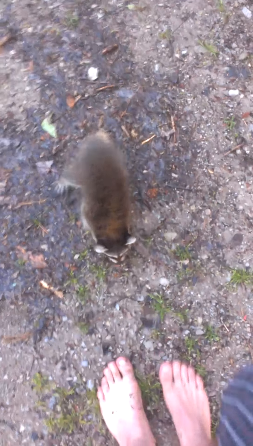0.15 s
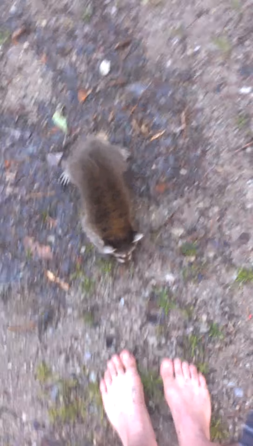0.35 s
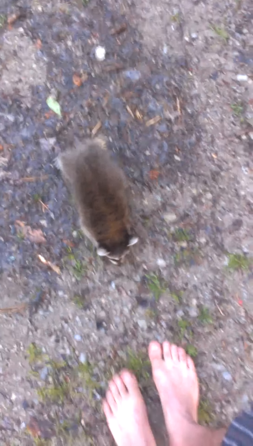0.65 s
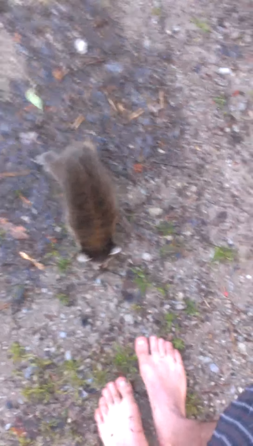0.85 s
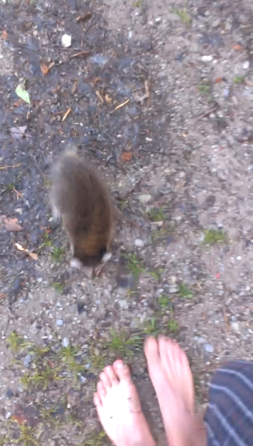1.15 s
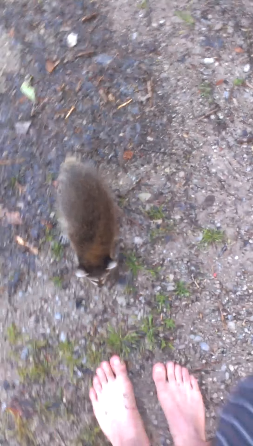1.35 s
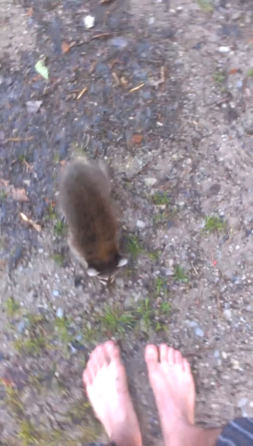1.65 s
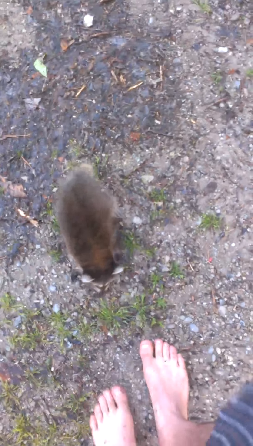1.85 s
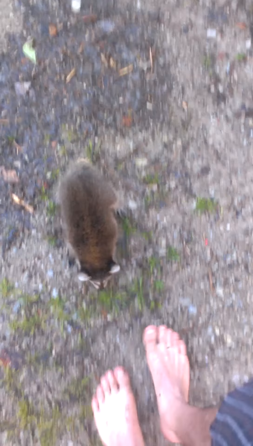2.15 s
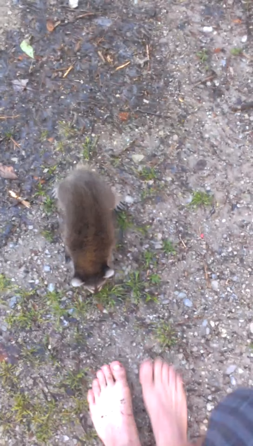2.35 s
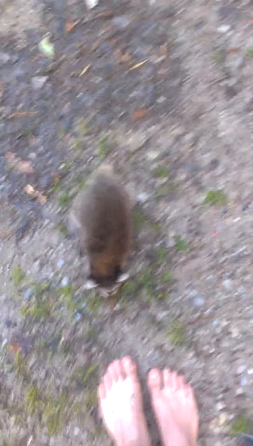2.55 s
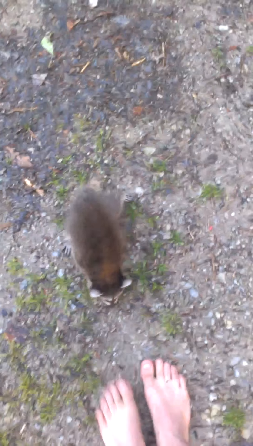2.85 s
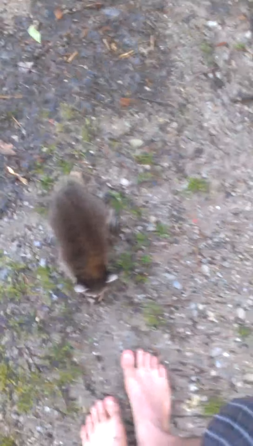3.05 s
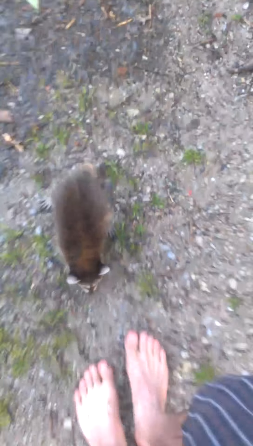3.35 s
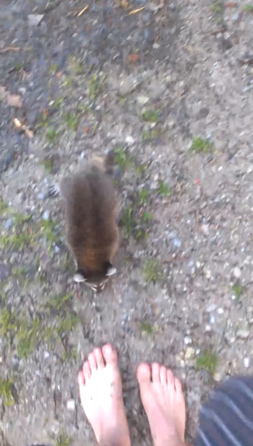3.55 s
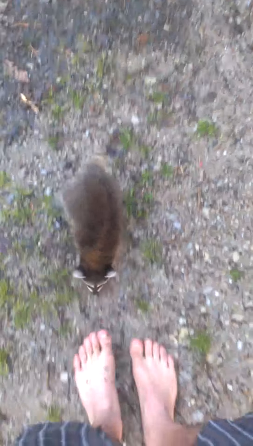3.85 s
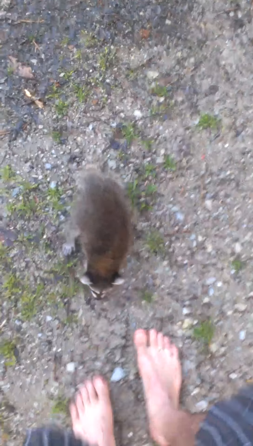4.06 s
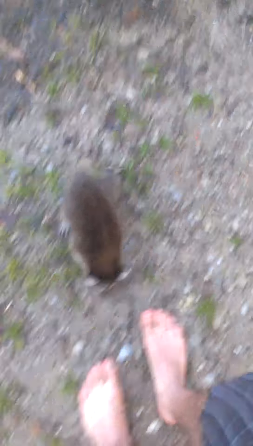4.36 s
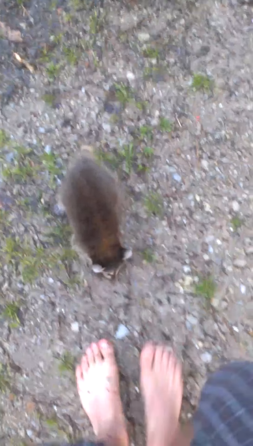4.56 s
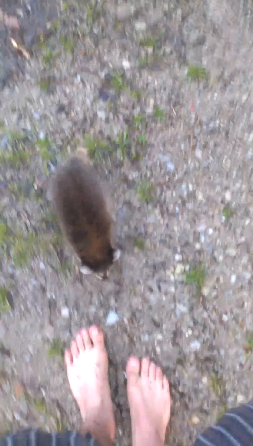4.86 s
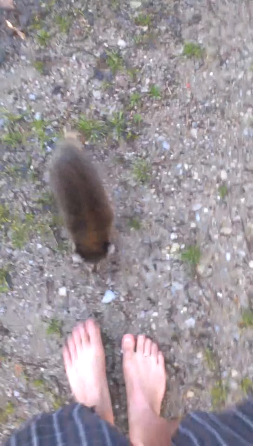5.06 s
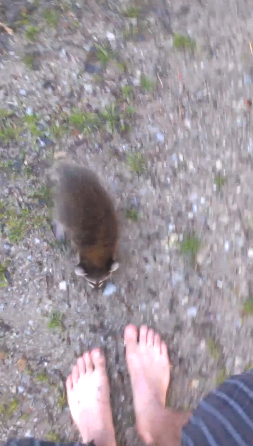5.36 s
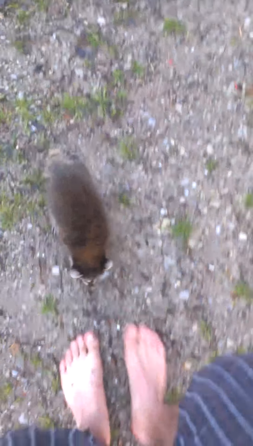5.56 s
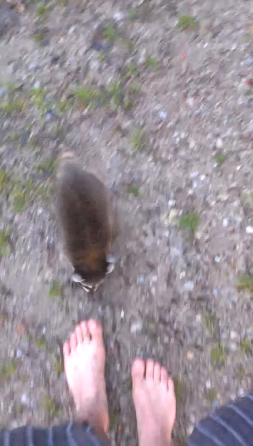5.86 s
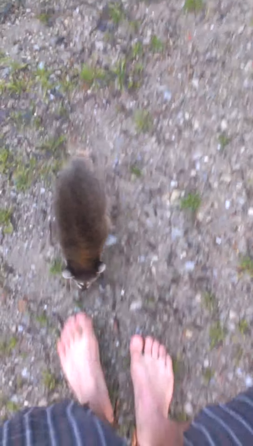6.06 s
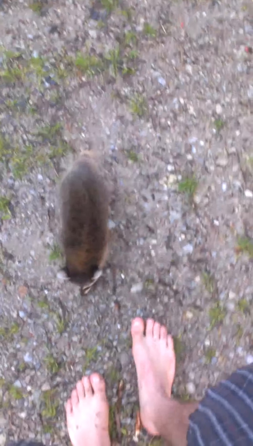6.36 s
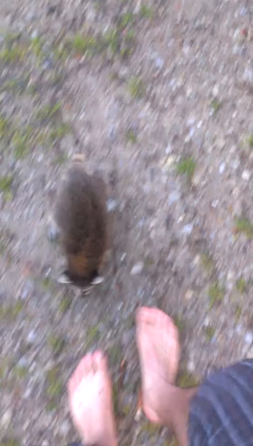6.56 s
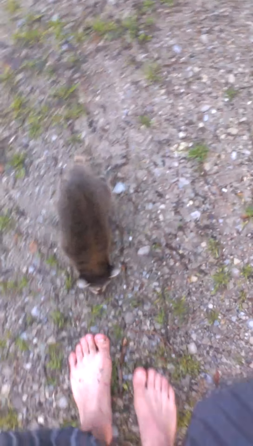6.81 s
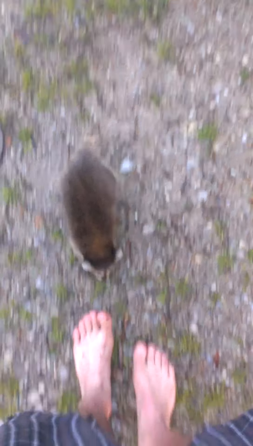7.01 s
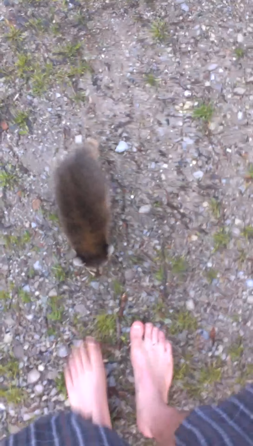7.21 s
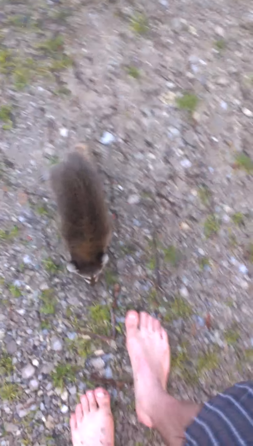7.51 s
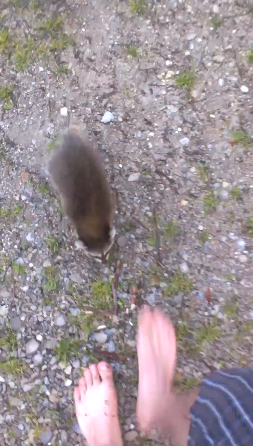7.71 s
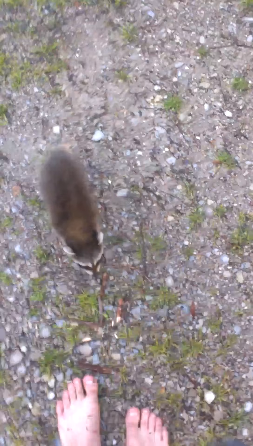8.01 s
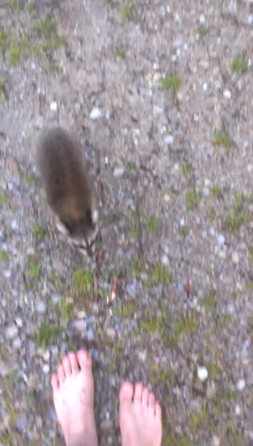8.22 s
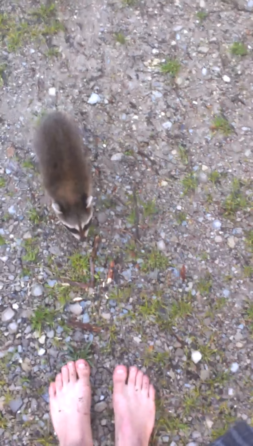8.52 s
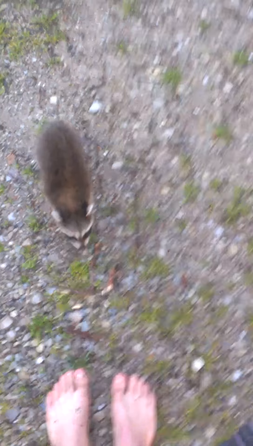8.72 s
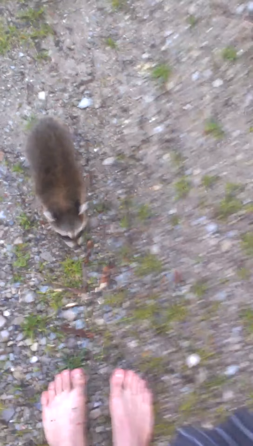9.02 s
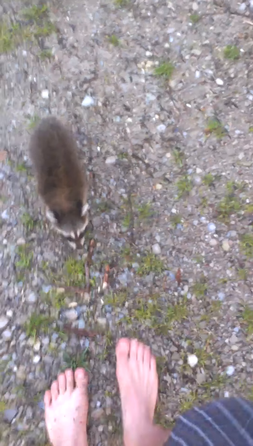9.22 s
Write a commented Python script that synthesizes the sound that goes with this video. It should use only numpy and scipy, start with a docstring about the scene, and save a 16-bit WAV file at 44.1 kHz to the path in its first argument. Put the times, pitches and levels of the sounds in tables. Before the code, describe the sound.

A baby raccoon gives three short rising whistled chirps and fluttering purrs as bare feet crunch softly on gravel, with distant birds singing.

```python
"""Baby raccoon calling on a gravel path

A baby raccoon follows a barefoot walker over gravel, a metre below a hand-held phone with two microphone ports.
It gives three rising whistled chirps and a grunt, built from gliding overtones, and fluttering purrs of short beats.
Grit ticks underfoot as bursts of noise, and cloth rustles; birds whistle gliding tones from the trees.
Soft air and a low far drone lie beneath; the phone's noise suppressor opens for sound in the voice band.
"""
import sys
import numpy as np
from scipy import signal
from scipy.fft import rfft, irfft
from scipy.io import wavfile
from scipy.ndimage import uniform_filter1d

SR = 44100
rng = np.random.default_rng(int(sys.argv[2]) if len(sys.argv) > 2 else 0)


def inscribe(sig):
    """Save sig as 16-bit PCM at rate SR to the path in sys.argv[1].

    A 1-D sig is mono; a 2-D sig holds one channel per row.
    Samples are clipped to [-1, 1] before scaling.
    """
    pcm = np.round(np.clip(np.atleast_2d(sig).T, -1, 1) * 32767)
    wavfile.write(sys.argv[1], SR, pcm.astype(np.int16))


N = 413658
T = np.arange(N) / SR  # time [s]
FREQS = np.fft.rfftfreq(N, 1 / SR) + 1e-3  # [Hz], kept above zero for the logarithm

# three chirps and a grunt, one row a call: (time [s], rasp at the start [dB], length [s], attack [s], scoop [s],
# first pitch [Hz], knee pitch [Hz], top pitch [Hz], level [dB], fade by the end [dB])
CALLS = [(3.347, -60, .216, .028, .047, 585, 868, 1135, -25.4, 4),
         (4.413, -48, .243, .018, .083, 625, 892, 1228, -25.1, 10),
         (6.812, -60, .237, .011, .068, 670, 850, 1252, -25.1, 9.5),
         (6.612, -35.5, .046, .004, .02, 660, 612, 645, -31.3, 13)]


def amp(db):
    """Decibels to gain."""
    return 10 ** (np.asarray(db) / 20)


def unit(x):
    """Scale to rms 1."""
    return x / np.sqrt(np.mean(x ** 2))


def curves(table):
    """The columns of a table as curves in time."""
    s, *columns = np.transpose(table)
    return [np.interp(T, s, c) for c in columns]


def spectra(table):
    """The columns of a table as curves over log frequency."""
    hz, *columns = np.transpose(table)
    return [np.interp(np.log(FREQS), np.log(hz), c) for c in columns]


def resonance(hz, centre, width):
    """Gain of a rounded resonance with steep skirts, down to a quarter one width off centre."""
    return 1 / (1 + ((hz - centre) / width) ** 2) ** 2


def band_noise(size, centre, width):
    """Noise in one resonance, rms 1."""
    spectrum = rfft(rng.standard_normal(size))
    return unit(irfft(spectrum * resonance(np.fft.rfftfreq(size, 1 / SR), centre, width), size))


def walk(rate, size=N):
    """Smooth random curve with a spread near 1, heading for a new value `rate` times a second."""
    k = max(int(SR / rate), 2)
    steps = np.repeat(rng.standard_normal(size // k + 1), k)
    return 1.227 * uniform_filter1d(steps, k)[:size]


def add(out, s, x):
    """Mix a short sound in at time s."""
    i = max(int(s * SR), 0)
    out[i:i + len(x)] += x[:max(N - i, 0)]


def arc(u, first, middle, last):
    """A smooth bend through three values as u goes from 0 to 1."""
    return np.polyval(np.polyfit([0, .5, 1], [first, middle, last], 2), u)


def trees(x, t60, wet_db):
    """Scattered echoes from trunks and leaves, partly alike at the two ports; they fall 60 dB in t60 seconds."""
    t = T[:SR]
    decay = amp(-60 * t / t60) * (1 - np.exp(-t / 0.004))
    mid, side = rng.standard_normal((2, SR)) * decay
    tails = [unit(mid + sign * 0.42 * side) / np.sqrt(SR) for sign in (1, -1)]
    return amp(wet_db) * np.array([signal.fftconvolve(x, h)[:N] for h in tails])


def raccoon(echo_s=.098, echo_db=-27, airy_db=-40.5):
    """The slightly airy voice reaches each port directly and off the ground; a far wall returns it once."""
    # how the near ground colours the two ports: (frequency [Hz], left minus right [dB], left leads [rad])
    port_colour = [(400, -0.5, 0), (661, -0.5, 0.68), (730, 9, 1), (800, 4.5, -.8), (880, -2.5, -.95),
                   (950, -13.5, -.5), (1020, -9, 1.0), (1080, -1, 1.7), (1166, 5.5, 1.3), (1230, 20, .3),
                   (1600, 3, 0), (9000, 3.5, 0)]
    voice = chirps() + purrs()
    effort = uniform_filter1d(np.abs(voice), SR // 200)
    breath = amp(airy_db + 2.5 * walk(30) + 2.5 * walk(400)) * effort * band_noise(N, 4500, 4100)
    voice = voice + breath
    balance_db, lead = spectra(port_colour)
    ratio = amp(balance_db) * np.exp(1j * lead)
    # the two ports average to the plain voice
    ports = 2 * np.array([ratio, np.ones_like(ratio)]) / (1 + ratio)
    near = irfft(rfft(voice) * ports, N)
    dulled = irfft(rfft(voice) * resonance(FREQS, 1300, 450), N)
    echo = amp(echo_db) * np.interp(T - echo_s, T, dulled)
    return near + echo + trees(voice, t60=0.46, wet_db=-22.5)


def chirps(jitter=.004, shimmer_db=0.26, full_voice_db=-35.5, pressed_hz=940, slack_db_per_hz=0.3):
    """A nearly pure rising whistle; its weak overtones light up as they cross the throat's resonances."""
    # throat and mouth resonances, one list a call: (centre [Hz], width [Hz], gain at the peak [dB])
    throats = [
        [(1800, 310, -57.5), (2200, 140, -63.5), (2680, 280, -58.5), (4230, 320, -42.5), (4840, 167, -31),
         (6680, 820, -34)],
        [(1506, 143, -53.5), (2000, 540, -73), (3590, 300, -61), (4470, 540, -39), (4990, 170, -44),
         (5970, 320, -35.5)],
        [(1500, 240, -62.5), (2265, 390, -70), (3690, 190, -54.5), (4530, 450, -39), (5830, 420, -37.5)],
        [(1350, 440, -78)],
    ]
    # the voice's overtones: (multiple of the pitch, level going into the throat [dB])
    overtones = [(2, 7.5), (3, 4), (4, -6), (5, -15), (6, -35), (7, -33.5)]
    out = np.zeros(N)
    for (s, _, *call), throat in zip(CALLS, throats):
        pitch, level = gesture(*call)
        hz = pitch * (1 + jitter * walk(250, len(pitch)))
        db = level + shimmer_db * walk(180, len(hz))
        phase = 2 * np.pi * np.cumsum(hz) / SR
        voice = amp(db) * np.sin(phase)
        # overtones hold while the folds close fully; the high ones bloom once the folds are taut
        closure = amp(2 * np.minimum(db - full_voice_db, 0))
        tension = amp(slack_db_per_hz * np.minimum(hz - pressed_hz, 0))
        for k, overtone_db in overtones:
            k = round(k)
            gain = sum(amp(peak_db) * resonance(k * hz, centre, width) for centre, width, peak_db in throat)
            strength = closure * (tension if k > 2 else 1)
            flicker = amp(overtone_db + 1.8 * walk(150, len(hz)))
            voice += strength * gain * flicker * np.sin(k * phase)
        add(out, s, np.sqrt(2) * voice)
    return out


def gesture(length, attack_s, scoop_s, first_hz, knee_hz, top_hz, level_db, fade_db):
    """Pitch and level of one call: it scoops to its knee, climbs ever faster, rests on top, then drops away."""
    scoop_power, climb_power, fade_power = 1.6, 2.3, 5
    top_hold_s, release_s, drop_hz_per_s = .017, .008, 7500
    t = T[:int((length + 2 * release_s) * SR)]
    strain = np.minimum(t / (length - top_hold_s), 1)
    over = np.maximum(t - length, 0)  # time since the voice let go
    scoop = (first_hz - knee_hz) * np.maximum(1 - t / scoop_s, 0) ** scoop_power
    climb = (top_hz - knee_hz) * strain ** climb_power
    envelope = np.sin(np.pi / 2 * np.minimum(t / attack_s, 1)) * np.exp(-(over / release_s) ** 2)
    db = level_db - fade_db * strain ** fade_power + 20 * np.log10(envelope + 1e-6)
    return knee_hz + scoop + climb - drop_hz_per_s * over, db


def purrs(arch=0.15, second_db=-30, third_db=-40, flutter_db=-10, crackle_db=-10.5, lean=.25,
          length_scatter=.18):
    """Each beat swings the folds for some uneven cycles; pitch arches with a puff that ends faster than it builds."""
    # the folds catch with a short rasp just before each call
    catch_lead_s, catch_s, catch_hz, catch_rough = .002, .005, 600, .8
    catches = [(s - catch_lead_s, catch_hz, db, catch_s, catch_rough) for s, db, *_ in CALLS]
    out, t = np.zeros(N), np.arange(-SR // 40, SR // 40) / SR
    for s, hz, db, length, rough in [*beats(), *catches]:
        u = np.abs(2 * t / (length * np.exp(length_scatter * rng.uniform(-1, 1))))
        pressure = np.exp(-.6 * u ** (2.6 * (1 + lean * np.sign(t))))
        uneven = 1 + .065 * walk(600, len(t))
        arched = 1 + arch * (.3 - np.minimum(u ** 2, 2))
        phase = 2 * np.pi * np.cumsum(hz * uneven * arched) / SR
        overtones = amp(second_db) * np.sin(2 * phase) + amp(third_db) * np.sin(3 * phase)
        tone = np.sqrt(2) * (pressure * np.sin(phase) + pressure ** 2 * overtones)
        flutter = amp(flutter_db) * np.exp(-(t / 0.014) ** 2)
        rasp = rough * (pressure + flutter) * band_noise(len(t), hz, 430)
        # turbulent air between the folds
        puff = amp(crackle_db) * rough * pressure * band_noise(len(t), 1140, 1000)
        add(out, s + t[0], amp(db) * (np.sqrt(max(1 - rough ** 2, 0)) * tone + rasp + puff))
    return out


def beats():
    """Every purr beat as (s, pitch Hz, level dB, length s, roughness); effort bends through three levels a purr."""
    # one row a purr: (first full beat [s], last full beat [s], pitch at full voice [Hz], level of the lead-in [dB],
    # first beat [dB], middle beat [dB], last beat [dB], roughness [0-1])
    purr_rows = [(5.051, 5.209, 762, -44, -29.3, -26.3, -27.6, .18),
                 (5.421, 5.537, 780, -47, -35, -27.3, -28, .3),
                 (7.402, 7.486, 775, -45, -42.5, -47.5, -38.5, .5),
                 (7.718, 8.017, 820, -37.5, -32.5, -27.8, -34, .11),
                 (8.537, 8.621, 780, -58, -46, -44, -40.5, .55)]
    period_s = .041
    # a weak beat leads in and another trails off, closer than the rest (share of a period)
    edge_gap, trail_off_db = .76, -7
    # a beat at full voice; weaker beats are shorter and lower, later full beats longer
    full_db, full_s, shorten_per_db, sag_hz_per_db, lengthen = -27, .011, .015, 6, .3
    for first, last, hz, lead_db, first_db, middle_db, last_db, rough in purr_rows:
        u = np.linspace(0, 1, round((last - first) / period_s) + 1)
        gap = edge_gap * (last - first) * u[1]
        times = np.r_[first - gap, first + (last - first) * u, last + gap]
        levels = np.r_[lead_db, arc(u, first_db, middle_db, last_db), last_db + trail_off_db]
        for s, db, late in zip(times, levels, np.r_[0, u, 0]):
            effort_db = db - full_db
            length = full_s * np.exp(shorten_per_db * effort_db + lengthen * (late - .5))
            yield s, hz + sag_hz_per_db * effort_db, db, length, rough


def gravel(grains_per_s=300, pebble_t60_s=.015):
    """Low thuds and swells, pebble knocks, scuffs of many tiny grains, and loose grit whispering all the while."""
    # dull thuds of bare heels, but at 3.417 s and 4.501 s low swells of background bass, let through as the
    # suppressor opens for a call: (middle [s], pitch [Hz], level [dB], length at half height [s])
    thuds_and_swells = [(3.417, 65.4, -57, .12), (4.501, 71.7, -54, .12), (6.369, 66, -49, .06),
                        (6.994, 81.2, -43, .05), (8.621, 145.6, -58, .08)]
    # pebbles knocked underfoot: (time [s], ring [Hz], peak level [dB])
    pebble_knocks = [(1.084, 1497, -44.5), (1.208, 1720, -44), (1.553, 1291, -40), (2.834, 1050, -40),
                     (3.171, 1500, -31.5), (4.437, 9000, -44), (7.665, 1500, -43), (7.857, 5030, -38),
                     (7.859, 1600, -36.5), (7.942, 3930, -38), (9.180, 1405, -42), (9.357, 1386, -43)]
    # soles and paws scuffing the grit: (middle [s], length at half height [s], centre [Hz], level [dB])
    grit_scuffs = [(0.607, 0.091, 5300, -59), (1.949, .06, 5040, -59), (3.633, 0.023, 1460, -50),
                   (3.94, .07, 4470, -62), (5.088, .055, 6000, -62), (6.15, .08, 7000, -62),
                   (6.367, 0.048, 2970, -62), (7.933, 0.16, 4820, -57.5)]
    # the loose grit's whisper: (time [s], level [dB])
    grit_level = [(0, -71), (.9, -67), (2.5, -72), (6.3, -71), (9.38, -77)]
    out, t = np.zeros(N), T[:SR // 16]
    for s, hz, db, length in thuds_and_swells:
        u = T[:int(2 * length * SR)]
        add(out, s - length, np.sqrt(2) * amp(db) * np.hanning(len(u)) * np.sin(2 * np.pi * hz * u))
    for s, hz, db in pebble_knocks:
        knock = band_noise(len(t), hz, .5 * hz) * amp(-60 * t / pebble_t60_s)
        add(out, s, amp(db) * knock / np.abs(knock).max())
    for s, length, hz, db in grit_scuffs:
        size = int(2 * length * SR)
        grainy = band_noise(size, hz, .3 * hz) * amp(3 * walk(700, size))
        add(out, s - length, amp(db) * np.hanning(size) * unit(grainy))
    grain_sizes = amp(3 * np.minimum(rng.exponential(size=N), 4))
    grains = (rng.random(N) < grains_per_s / SR) * grain_sizes
    grit = signal.fftconvolve(grains, amp(-60 * t / 0.035))[:N] * band_noise(N, 3800, 6000)
    return out + amp(curves(grit_level)[0]) * unit(grit)


def trousers_and_low_noise(rustle_db=-9):
    """Cloth flaps dully and rustles as the legs pass; one like swell is soft low background noise."""
    # swish of trouser legs, but at 4.6 s soft low background noise, let through while the second call holds
    # the suppressor open: (middle [s], swell and fade time [s], level [dB])
    soft_swells = [(.552, .3, -58), (1.147, .26, -59.5), (1.8, .2, -59.5), (2.345, .16, -59.5),
                   (2.85, .24, -56.5), (4.237, .16, -62), (4.6, .12, -59), (6.381, .089, -57),
                   (8.60, .11, -55)]
    swing = sum(amp(db) * np.exp(-((T - s) / length) ** 2) for s, length, db in soft_swells)
    dull_noise = band_noise(N, 190, 300) + amp(rustle_db) * band_noise(N, 1000, 2900)
    return swing * amp(3.2 * walk(30)) * dull_noise


def birds(wren_db=-3):
    """A wren in the nearer trees; whistles, chips, a dove and a trill further off, all gliding tones."""
    # notes: (start in the phrase [s], length [s], first, middle and last pitch [Hz], level before the run's [dB])
    wren_notes, wren_whistle = [(-.003, .018, 5120, 4200, 3830, -44), (.022, .014, 3760, 3360, 3020, -39),
                                (.026, 0.04, 4720, 3960, 3150, -40), (.044, .028, 2204, 2712, 3670, -35),
                                (.086, 0.026, 2883, 3224, 3589, -39.5),
                                (.122, 0.019, 2058, 2346, 2355, -35), (.195, .070, 2750, 2530, 2400, -42),
                                (.255, 0.12, 2350, 2000, 1857, -47)], [(.214, .040, 2558, 2517, 2524, -30.5)]
    slow_whistle, fast_whistle = [(-.04, .07, 3850, 3520, 3380, -63), (.11, 0.063, 2010, 2190, 2070, -61)], [(-.025, 0.053, 2463, 2174, 1896, -53.5),
                                                        (.035, 0.044, 1985, 1720, 1500, -64),
                                                        (.135, .05, 3860, 3680, 3600, -59.5)]
    low_chip, high_chip = [(-.012, .022, 4400, 4570, 4880, -54)], [(-.009, .018, 5850, 6150, 6450, -66),
                                             (.025, .035, 4400, 4750, 4550, -69)]
    dove_coo, lone_notes = [(0, .27, 478, 487, 474, -60)], [(.649, .013, 2700, 2520, 2380, -54.5),
                                          (.791, .016, 2230, 2350, 2480, -56),
                                          (.931, .08, 3000, 2930, 2880, -59)]  # lone notes start at scene times
    # runs: (first phrase [s], last phrase [s], period [s], level added [dB], softer start [dB],
    # pitch change over the run [share])
    wren_run, wren_whistle_run = (1.249, 2.471, .407, -2, 7, 0), (1.238, 2.471, .407, -2, 7, 0)
    slow_run, fast_run = (3.91, 6.38, .309, 3, 6, -.05), (6.775, 9.34, .256, -2.2, 2.5, 0)
    low_chip_run, high_chip_run = (.087, .938, .107, 1, 3, 0), (3.982, 5.592, .107, -1, 6, 0)
    # the dove's coos: (time [s], level added [dB], pitch ratio)
    dove_times = [(.36, -3.5, .91), (2.8, -5, 1), (3.755, .5, 1)]
    # a thin far trill: (time [s], centre [Hz], level [dB])
    trill_glide = [(4.7, 3323, -72), (5.6, 3600, -67), (6.4, 3980, -57.5), (7.4, 3950, -62),
                   (7.8, 3900, -80)]
    warble = song(wren_notes, repeats(wren_run), waver=0.018)
    whistle = song(wren_whistle, repeats(wren_whistle_run))
    wren = amp(wren_db) * warble + trees(warble, t60=0.7, wet_db=-1.5)
    wren = wren + whistle + trees(whistle, t60=0.84, wet_db=-7.5)
    phrases = [(slow_whistle, slow_run), (fast_whistle, fast_run), (low_chip, low_chip_run),
               (high_chip, high_chip_run)]
    far = sum(song(notes, repeats(run)) for notes, run in phrases)
    far = far + song(dove_coo, dove_times) + song(lone_notes)
    hz, db = curves(trill_glide)
    singing = (T > trill_glide[0][0]) & (T < trill_glide[-1][0])
    flutter = band_noise(N, 0, 130)  # slow noise makes the gliding tone tremble
    trill = singing * amp(db) * flutter * np.sqrt(2) * np.sin(2 * np.pi * np.cumsum(hz) / SR)
    return wren + far + trees(far, t60=.6, wet_db=-5.5) + trill


def song(notes, times=((0, 0, 1),), waver=0.0037):
    """A bird repeats its phrase of pure gliding notes, each pitch wavering by chance."""
    out = np.zeros(N)
    for s, phrase_db, ratio in times:
        for start, length, first, middle, last, db in notes:
            u = np.linspace(0, 1, int(length * SR))
            hz = ratio * arc(u, first, middle, last) * (1 + waver * walk(120, len(u)))
            tone = np.sin(np.pi * u) * np.sin(2 * np.pi * np.cumsum(hz) / SR)
            add(out, s + start, np.sqrt(2) * amp(db + phrase_db) * tone)
    return out


def repeats(run, scatter_db=.8, warm_up_s=.2):
    """An even run of phrases that starts softly, as rows (s, level dB, pitch ratio)."""
    first, last, period, db, soft_db, drift = run
    s = np.linspace(first, last, round((last - first) / period) + 1)
    level = db - soft_db * np.exp((first - s) / warm_up_s) + scatter_db * rng.uniform(-1, 1, len(s))
    return list(zip(s, level, 1 + drift * np.linspace(-.5, .5, len(s))))


def air(air_db=-51.4, flicker_db=2):
    """Soft outdoor air, noise whose bass stirs most, with a far engine droning under it."""
    # colour of the outdoor air: (frequency [Hz], relative level per Hz [dB])
    air_colour = [(25, -26.5), (45, -4), (65, 2), (120, -8.5), (200, -10), (310, -20), (480, -21),
                  (720, -26), (1300, -27.5), (2000, -29.5), (3000, -31.5), (4600, -32.5), (6500, -33.5),
                  (10400, -34.5)]
    # likeness of the air at the two ports: (frequency [Hz], correlation)
    port_likeness = [(40, 0.1), (70, 0.25), (130, 0.99), (1000, 0.36), (4000, 0.25), (8000, 0.39)]
    # far drone: (time [s], pitch [Hz], level [dB])
    drone_glide = [(0, 66.5, -48), (.65, 70, -40), (1.25, 71.7, -41), (1.85, 68.1, -47), (2.05, 66, -62),
                   (6.3, 62, -65), (7.1, 59.3, -52), (9.38, 63, -51.5)]
    colour_db, = spectra(air_colour)
    likeness = np.clip(spectra(port_likeness)[0], -1, 1)
    noise = rfft(rng.standard_normal((2, N))) * amp(colour_db)
    mid, side = noise * np.sqrt([1 + likeness, 1 - likeness])
    both = np.array([mid + side, mid - side])
    bass = resonance(FREQS, 0, 450)
    hiss = irfft(both * (1 - bass), N) * amp(.8 * walk(16))
    hush = irfft(both * bass, N) * amp(flicker_db * walk(12)) + hiss
    hz, db = curves(drone_glide)
    phase = 2 * np.pi * np.cumsum(hz * (1 + .05 * walk(25))) / SR
    port_lead = np.array([[.55], [-.55]])  # [rad]
    hum = np.sin(phase + port_lead) + amp(-19) * np.sin(2 * phase)
    drone = np.sqrt(2) * amp(db + 2.5 * walk(10)) * hum
    return amp(air_db) * unit(hush) + drone


def scene():
    """The raccoon near by, the walker on the gravel, the birds and the air."""
    return raccoon() + gravel() + trousers_and_low_noise() + birds() + air()


def record(dry, depth_db=8, open_db=-41, hold_s=0.055, top_hz=10450):
    """The suppressor turns everything down unless there is sound in the voice band; the top is cut."""
    voice_band = irfft(rfft(dry.mean(axis=0)) * resonance(FREQS, 897, 740), N)
    power = uniform_filter1d(voice_band ** 2, int(hold_s * SR))
    key_db = 10 * np.log10(np.abs(power) + 1e-12)
    shut = np.clip((open_db - key_db) / 14, 0, 1)  # fully shut 14 dB below the opening level
    top = signal.ellip(12, .2, 70, top_hz, fs=SR, output="sos")
    return signal.sosfilt(top, dry * amp(-depth_db * shut))


dry = scene()
out = record(dry)
inscribe(out)
```